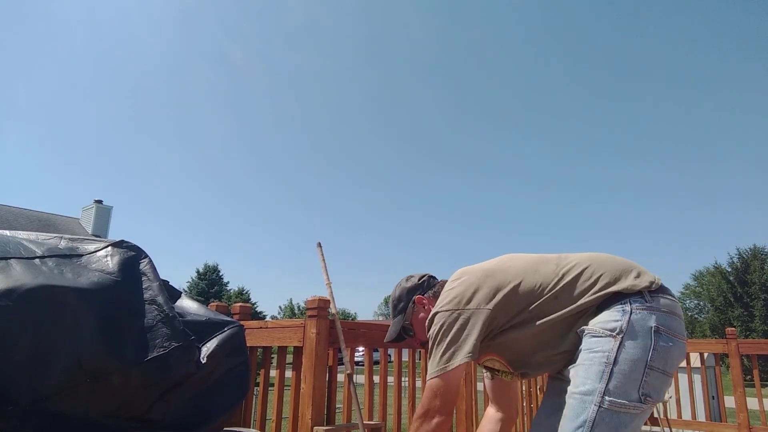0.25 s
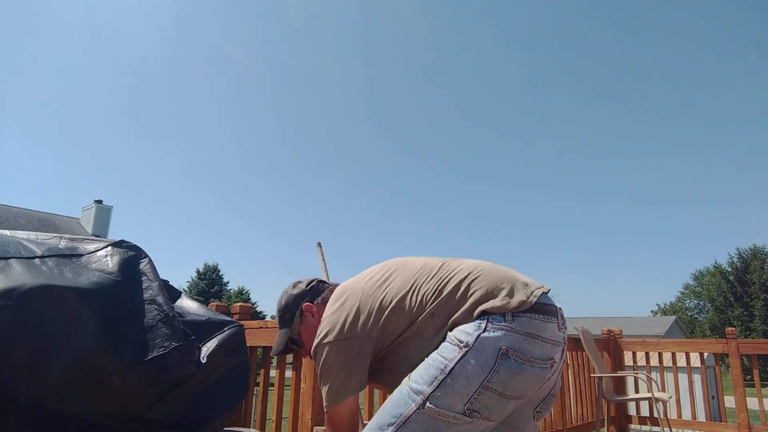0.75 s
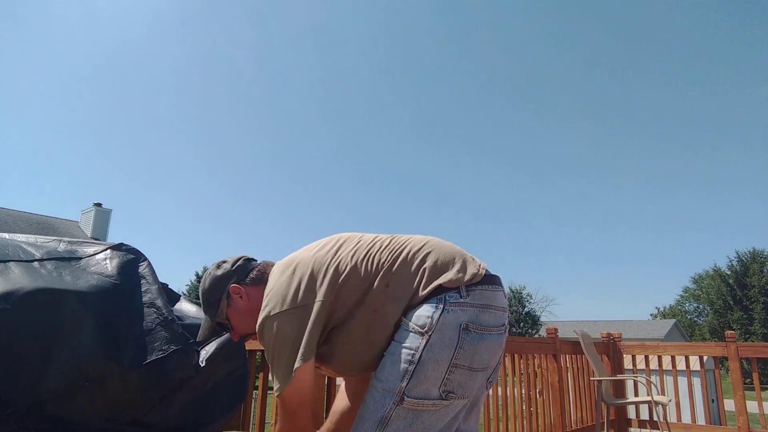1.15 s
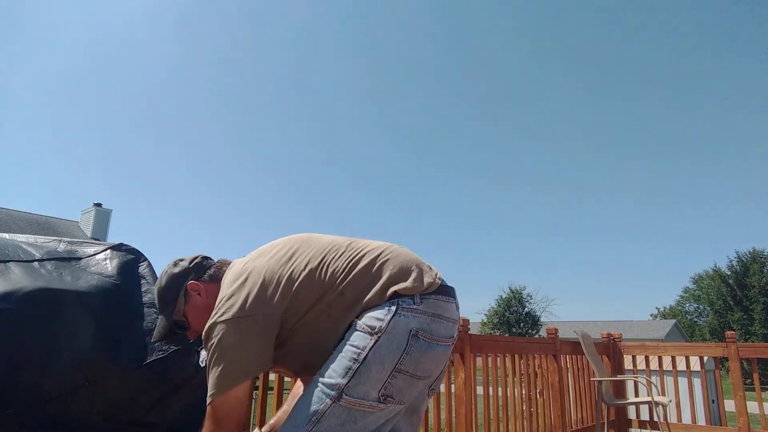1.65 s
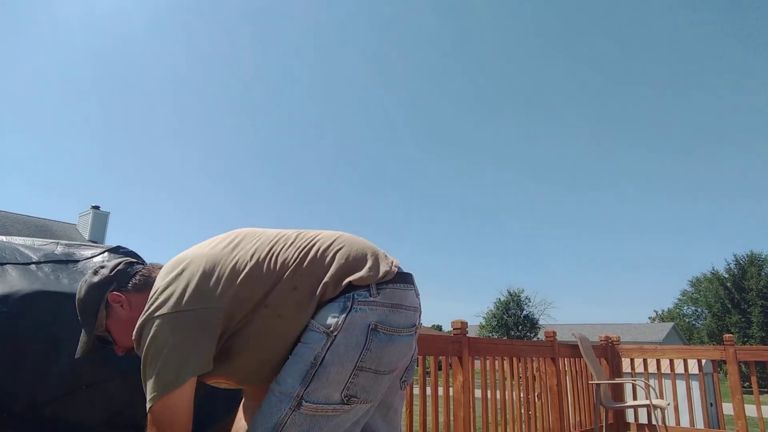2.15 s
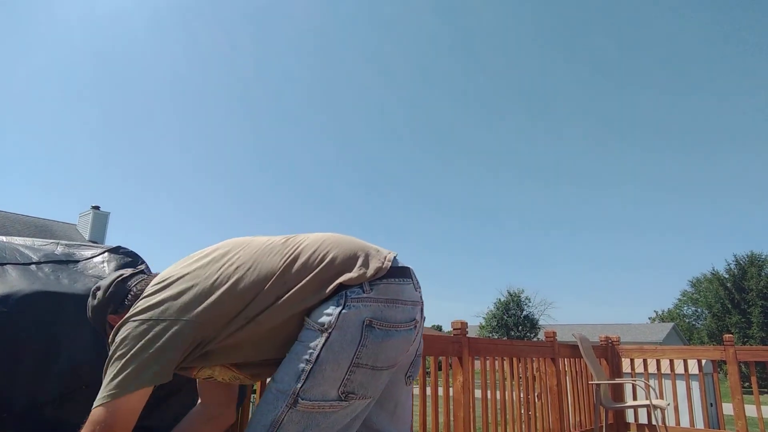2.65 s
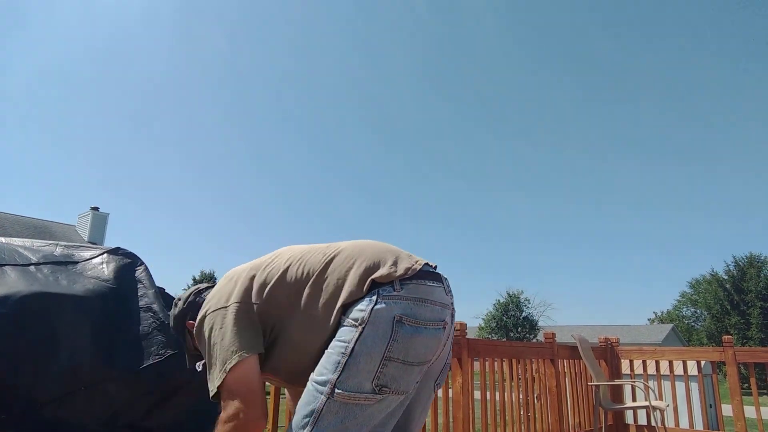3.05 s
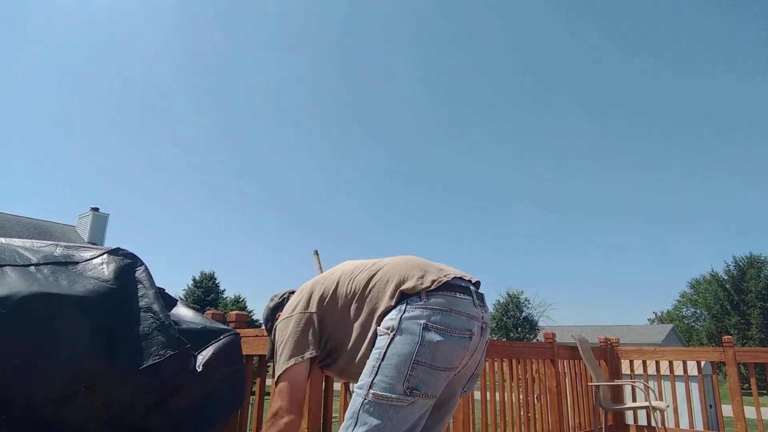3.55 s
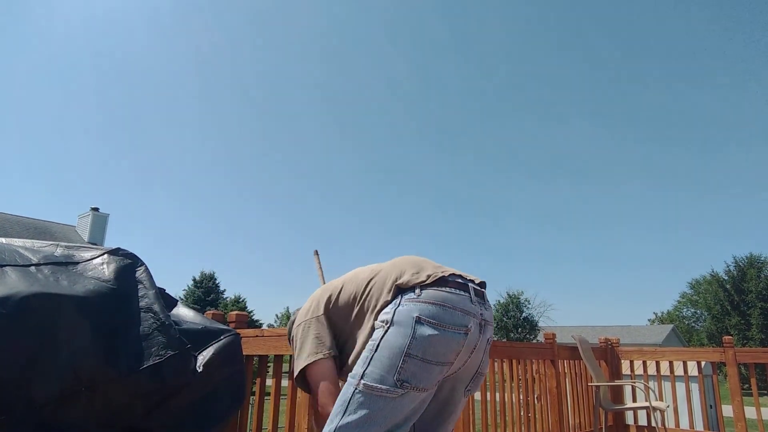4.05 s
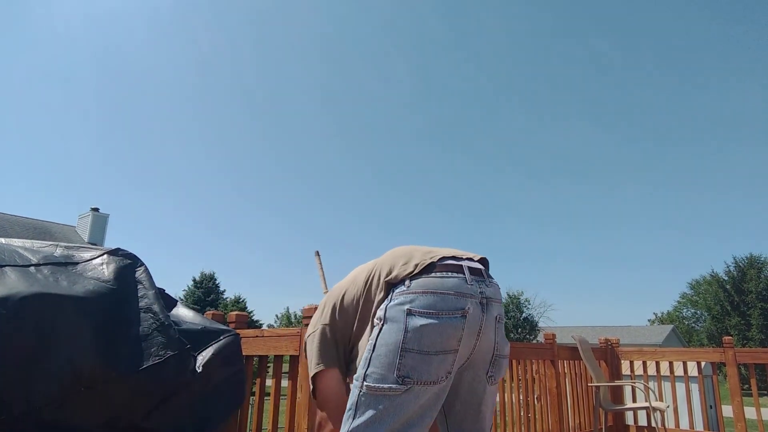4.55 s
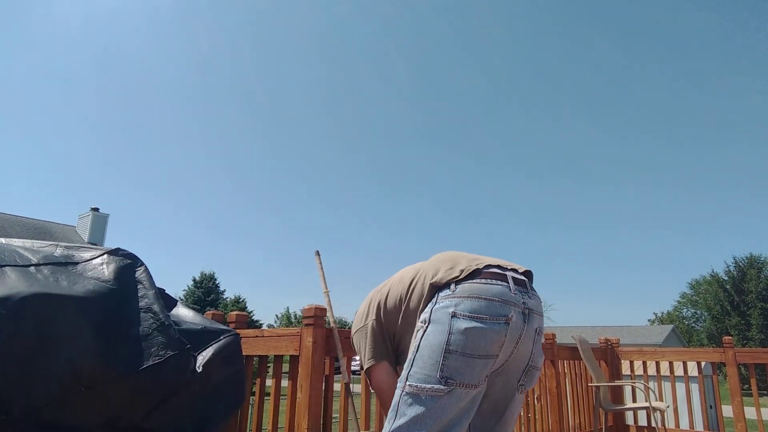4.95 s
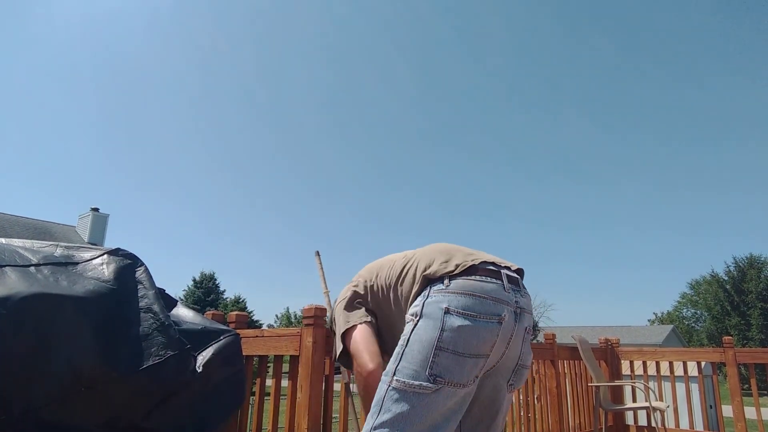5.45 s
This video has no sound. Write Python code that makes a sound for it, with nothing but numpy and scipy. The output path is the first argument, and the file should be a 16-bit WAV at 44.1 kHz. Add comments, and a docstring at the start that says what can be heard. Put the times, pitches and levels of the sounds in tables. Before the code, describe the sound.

Outdoors on a wooden deck, a heavy metal drum is heaved along close to a stereo microphone. Light knocks and a gritty scrape come first, then a tight cluster of loud board slaps around one second. Further heavy knocks follow in uneven bursts, with low rumble, dull metallic ringing and small woody taps between them. A small bird chirps faintly far off.

```python
"""A heavy metal drum is rolled in short heaves across a wooden deck, outdoors, close to two microphone ports.
Its rim knocks on the boards, which slap, tap, clatter and boom: bursts of noise and decaying sines.
Between knocks it rumbles and scrapes over the grain, as uneven noise, and snaps bits of grit.
A small bird chirps far off in gliding sines, above a faint steady noise of still air."""
import sys
import numpy as np
from scipy import signal
from scipy.io import wavfile
from scipy.ndimage import map_coordinates

SR = 44100
rng = np.random.default_rng(int(sys.argv[2]) if len(sys.argv) > 2 else 0)


def store_pcm(level_fs):
    """Save levels as 16-bit WAV."""
    pcm = np.round(np.clip(level_fs, -1, 1) * 32767).astype(np.int16)
    wavfile.write(sys.argv[1], SR, np.atleast_2d(pcm).T)


N = 252252
TIME = np.arange(N) / SR

# Rim meets board; the levels stand ahead of each layer's own trim. Each row: start in seconds, knock in dB,
# boom in dB, tick in dB, note of that board in Hz, level of the note relative to the boom in dB.
KNOCKS = [(0.012, -26.5, -38.5, -66, 484, 11.5), (0.139, -15.5, -27, -41, 510, 10.5),
          (0.18, -15.5, -40, -28, 248, 12), (0.218, -19, -50, -45, 514, 4),
          (0.292, -20, -39, -21.5, 245, 0), (0.515, -55, -36.5, -44, 100, 2.5),
          (0.564, -20, -43, -29, 325, 7), (0.636, -58, -33.5, -61, 125, 2.5),
          (0.67, -27, -46, -67, 272, 15), (1.017, -4.5, -33, -20, 354, 20.5),
          (1.069, -10.5, -47, -23, 590, 5), (1.08, -6, -21.5, -28, 276, -12),
          (1.107, -4, -18.5, -26, 322, -26), (1.168, -8, -21, -28.5, 278, -19),
          (1.549, -17.5, -51, -23, 428, -6), (1.644, -26, -39.5, -40, 274, 12.5),
          (1.921, -1.5, -22, -34, 510, 3), (2.018, -10, -31, -38, 410, -3),
          (2.092, -30.5, -53, -66, 596, 21.5), (2.275, -35.5, -42.5, -55, 178, 1.5),
          (2.866, -31.5, -35, -50, 480, 4), (2.889, -6.5, -35, -39, 430, 14.5),
          (2.897, -0.5, -23.5, -29, 550, 4), (3.058, -32.5, -46, -65, 550, 16),
          (3.296, -9.5, -34, -29.5, 240, 4), (3.332, -10, -36.5, -26, 384, 14.5),
          (3.357, -5, -20, -34, 258, 5.5), (3.412, -11.5, -32, -37, 557, -2),
          (3.48, -5.5, -27.5, -33, 350, -10), (3.489, -11, -23.5, -34, 282, 11.5),
          (3.585, -34, -36.5, -60, 368, 12.5), (3.896, -24.5, -32.5, -63, 319, 4.5),
          (4.134, -19, -34, -36.5, 282, 14), (4.161, -4.5, -48, -57, 600, -7),
          (4.212, -13, -37, -37, 390, 13), (4.641, -6, -26, -51, 393, 10),
          (5.066, -18.5, -33.5, -58, 360, 5), (5.122, -23, -39, -27.5, 268, 15),
          (5.304, -12.5, -22, -45, 364, 6), (5.319, -6, -32.5, -36, 544, 25.5),
          (5.341, -14.5, -38, -30.5, 365, 22)]


def from_db(db):
    """Decibels to amplitude gain."""
    return 10 ** (np.asarray(db) / 20)


def at_hz(points, hz):
    """Read a table of (Hz, value) on a log-frequency axis."""
    f, value = np.transpose(points)
    return np.interp(np.log(hz), np.log(f), value)


def drift(per_s):
    """Smooth chance: straight lines between random knots of spread 1, per_s of them a second."""
    knots = rng.standard_normal(N // 8)
    return np.interp(TIME * per_s, np.arange(len(knots)), knots)


def grain(per_s, rough_db):
    """An uneven contact force of rms 1."""
    force = from_db(rough_db * drift(per_s))
    return force / np.sqrt(np.mean(force ** 2))


def clicks(seconds, heights):
    """One impulse for each blow, over a tiny floor."""
    samples = np.round(np.clip(seconds, 0, TIME[-1]) * SR).astype(int)
    return np.bincount(samples, heights, N) + 1e-18


def ring(force, hz, t60):
    """A resonator: a unit click sets a sine of height 1 ringing, down 60 dB after t60 seconds."""
    radius = from_db(-60 / (t60 * SR))
    w = 2 * np.pi * hz / SR
    return signal.lfilter([0, np.sin(w)], [1, -2 * radius * np.cos(w), radius * radius], force)


def die_away(energy, t60):
    """Stored energy leaks away exponentially, down 60 dB after t60 seconds."""
    return signal.lfilter([1], [1, -from_db(-120 / (t60 * SR))], energy)


def swell(s, db, rise, fall):
    """Power of a push that grows up to its moment and then dies away."""
    span_db = 20.5  # covered in one rise or fall time
    distance = np.maximum((s - TIME) / rise, (TIME - s) / fall).clip(max=10)
    return from_db(db - span_db * distance) ** 2


def deck(knock_db=-11, boom_db=-2, tick_db=-13, clatter_t60=0.11, crack_t60=0.015, crack_db=3):
    """Each knock cracks, then sets the boards clattering briefly; the whole frame booms on, longest in the bass."""
    # Colour of the struck deck. Each row: frequency in Hz, relative level in dB.
    deck_colour = [(30, -27), (65, -10), (100, -10.5), (160, 1.5), (260, 5), (450, 2), (800, -4.5),
                   (1250, -3), (1900, -20), (2600, 4), (3600, -14.5), (5200, -10), (8500, -25),
                   (15000, -19)]
    # Die-away of the deck. Each row: frequency in Hz, t60 in seconds.
    boom_t60 = [(60, 1), (170, 0.63), (340, 0.49), (700, 0.43), (1400, 0.29), (3000, 0.11), (15000, 0.23)]
    # Share of the long boom against the first clatter. Each row: frequency in Hz, level in dB.
    boom_share = [(60, -4), (200, -2), (500, -9.5), (1200, -16), (4000, 14), (15000, -36)]
    splinter_from_db, splinter_growth = -30.5, 0.99  # tick where splintering starts; crack dB per tick dB

    s, knock, boom, tick, _, _ = np.transpose(KNOCKS)
    splinter = splinter_growth * np.maximum(tick - splinter_from_db, 0)
    rattle = grain(260, rough_db=2.5) ** 2

    def band_power(hz):
        # boom rules the bass, knock the middle, tick the treble
        low = at_hz([(230, 1), (600, 0)], hz)
        high = at_hz([(1600, 0), (2600, 1)], hz)
        level = low * (boom + boom_db) + high * (tick + tick_db) + (1 - low - high) * (knock + knock_db)
        colour = at_hz(deck_colour, hz)
        energy = clicks(s, from_db(level + colour) ** 2)
        clatter = die_away(energy, clatter_t60)
        tail = die_away(energy, at_hz(boom_t60, hz)) * from_db(at_hz(boom_share, hz)) ** 2
        crack = clicks(s, (1 - low) * from_db(tick + tick_db + splinter + crack_db + colour) ** 2)
        return (clatter + tail) * rattle + die_away(crack, crack_t60)
    return band_power


def slaps(contact_s=0.0012, bend_hz=900, bend_width_hz=1300):
    """The full weight drops and the board under the rim cracks for a few cycles."""
    # Each row: start in seconds, level in dB, pitch in Hz.
    board_slaps = [(1.107, -4, 760), (1.55, -12, 1270), (1.9214, 3.5, 1060), (2.018, -13, 865),
                   (2.897, -2, 967), (3.357, -9, 656), (3.488, -5, 787), (4.161, 0.5, 890),
                   (4.64, -2.5, 925), (5.319, -1.5, 670)]
    # The struck board itself. Each row: multiple of the slap pitch, level in dB, t60 in seconds.
    slap_modes = [(.5, -9, 0.011), (1.0, 3.5, 0.0093), (1.33, -3, 0.013), (2.9, -15, 0.0049)]

    out = np.zeros(N)
    soft = np.exp(-2 * np.pi / (contact_s * SR))  # soft contact dulls the blow above 1 / contact_s
    push = (1 - soft) * soft ** np.arange(SR // 16)
    # bending waves disperse: an all-pass makes the blow swell over a cycle or two
    _, poles = signal.iirpeak(bend_hz, bend_hz / bend_width_hz, SR)
    push = signal.lfilter(poles[::-1], poles, push)
    for s, slap_db, hz in board_slaps:
        crack = np.zeros(len(push))
        for k, (multiple, db, t60) in enumerate(slap_modes):
            crack += (-1) ** k * from_db(db) * ring(push, multiple * hz, t60)
        start = int(s * SR)
        out[start:start + len(crack)] += from_db(slap_db) * crack
    return out


def taps(knock_db=-9, bump_db=3, chatter_db=-25, chatter_t60=0.31, per_s=45, spread_db=4, cycles=7):
    """Dry woody taps: one at each knock, and small ones as the rim rides ridges or chatters after a blow."""
    # A board tapped lightly. Each row: frequency in Hz, level in dB.
    tap_modes = [(290, -9.5), (505, -4.5), (680, -6.5), (950, -8), (1300, -14)]
    tap_top_db = -21  # the tap of a knock grows no harder than this

    s, knock = np.transpose(KNOCKS)[:2]
    chatter = die_away(clicks(s, from_db(knock + chatter_db) ** 2), chatter_t60)
    unrest = roll_power()[1] * from_db(bump_db) ** 2 + chatter
    born = rng.random(N) < per_s / SR
    sizes = from_db(spread_db * (np.minimum(rng.exponential(1, N), 3) - 1))
    ridges = born * np.sqrt(unrest) * sizes
    force = clicks(s, from_db(np.minimum(knock + knock_db, tap_top_db))) + ridges
    out = np.zeros(N)
    for k, (hz, db) in enumerate(tap_modes):
        uneven = from_db(db + 3.7 * drift(90))
        out += (-1) ** k * ring(force * uneven, hz, cycles / hz)
    return out


def boards(cycles=20, level_db=2):
    """Every board that takes the weight bends and rings with a short hollow note, down 60 dB after `cycles`."""
    out = np.zeros(N)
    for s, _, boom, _, hz, note in KNOCKS:
        start = int(s * SR)
        age = TIME[:min(SR // 4, N - start)]
        onset = 1 - np.exp(-2 * hz * age)
        fade = from_db(boom + note + level_db - 60 * hz * age / cycles)
        out[start:start + len(age)] += onset * fade * np.sin(2 * np.pi * hz * age)
    return out


def drum(level_db=-2, spread_db=3):
    """The loaded shell rings dully; every knock meets each mode with a strength of its own."""
    # Drum and boards together. Each row: frequency in Hz, level in dB, t60 in seconds.
    shell_modes = [(78.7, -21, 0.31), (95.4, -23.5, 0.65), (153.4, -30, 0.33), (198.5, -18.5, 0.24),
                   (267.4, -12.5, 0.31), (295.7, -11, 0.15), (368, -26.5, 0.19), (433, -20.5, 0.58),
                   (484.4, -16.5, 0.24), (621, -18.5, 0.36), (980, -45, 0.147), (1146, -28, 0.093)]

    s, knock, boom = np.transpose(KNOCKS)[:3]
    chance = rng.standard_normal((len(s), 2, len(shell_modes)))
    blow_db = (knock + boom)[:, None] / 2 + level_db
    strength = np.sign(chance[:, 0]) * from_db(spread_db * chance[:, 1] + blow_db)
    out = np.zeros(N)
    for k, (hz, db, t60) in enumerate(shell_modes):
        out += ring(clicks(s, strength[:, k] * from_db(db)), hz, t60)
    return out


def roll_power():
    """Boom and rumble power of the rolling rim: heave upon heave over a slow creep."""
    # The drum gathers speed, then coasts. Each row: moment of top speed in seconds, boom in dB, rumble in dB,
    # rise in seconds, fall in seconds.
    heaves = [(0.1, -37.5, -39, 1, 1.0), (0.74, -40, -46, 0.061, 0.26), (1.09, -55, -27, 0.14, 0.18),
              (1.2, -33.5, -36, 0.099, .5), (1.8, -45.5, -59.5, 0.34, 0.44), (2.02, -40, -40.5, 0.38, 0.29),
              (2.95, -32.5, -42, 0.24, 0.21), (3.48, -29.5, -30.5, 0.15, 0.28),
              (4.19, -34.5, -39.5, 0.22, 0.46), (4.72, -40.5, -44.5, 0.25, 0.29),
              (5.13, -40.5, -32.5, 0.16, 0.31), (5.3, -35, -30, 0.058, 0.087)]
    creep_boom_db, creep_rumble_db = -56.5, -58  # the drum never quite rests

    boom = sum(swell(s, db, rise, fall) for s, db, _, rise, fall in heaves)
    rumble = sum(swell(s, db, rise, fall) for s, _, db, rise, fall in heaves)
    return boom + from_db(creep_boom_db) ** 2, rumble + from_db(creep_rumble_db) ** 2


def skid_level(creep_db=-75.5):
    """Level of the sliding contact in dB: skids of the rim over a slow creep."""
    # Each row: moment at its height in seconds, scrape in dB, rise in seconds, fall in seconds.
    skids = [(0.2, -47.5, 0.21, 0.38), (0.296, -33.5, 0.018, 0.033), (0.568, -52, 0.047, 0.068),
             (0.79, -60, .12, 0.14), (1.07, -44.5, 0.1, .27), (1.36, -45, 0.052, 0.044),
             (1.665, -47.5, 0.033, 0.08), (1.97, -54.5, 0.2, 0.15), (2.03, -48.5, 0.052, .075),
             (2.79, -66, 0.51, 0.39), (2.909, -46.5, 0.018, 0.11), (3.315, -41, .015, 0.12),
             (3.49, -52.5, 0.25, 0.14), (3.82, -55, 0.11, 0.12), (4.155, -50, 0.19, 0.19),
             (4.342, -46.5, 0.22, 0.054), (4.68, -57.5, 0.23, 0.13), (4.98, -51, 0.19, 0.32),
             (5.13, -51, 0.36, 0.31), (5.324, -35.5, 0.048, 0.072)]
    return 10 * np.log10(sum(swell(*skid) for skid in skids) + from_db(creep_db) ** 2)


def rolling(sliding, boom_db=0, rumble_db=0, scrape_db=-8, drag_db=-2):
    """The rim bumps over the grain, skids on grit and drags: noise bands with uneven power."""
    # Short drags of the rim. Each row: middle in seconds, level in dB ahead of drag_db, half length in seconds.
    drags = [(0.315, -27, 0.017), (1.357, -29, 0.012), (1.669, -35.5, 0.011), (3.653, -36.5, 0.009),
             (3.827, -35, 0.027), (4.341, -38, 0.027), (5.108, -34, 0.031), (5.196, -34.5, 0.013)]
    # Colours of the three contacts. Each row: frequency in Hz, relative level in dB.
    rumble_colour = [(30, -15), (60, -3), (100, 5), (160, 2.5), (270, -3), (500, 1), (900, -7),
                     (1400, -7.5), (2000, -33), (3500, -16.5), (8000, -50), (16000, -51)]
    scrape_colour = [(30, -1), (300, -10), (1300, 12.5), (1900, -5.5), (2600, 7), (3700, 8.5), (5200, 1.5),
                     (7000, -8.5), (9000, -12.5), (12000, -8), (15000, -2)]
    drag_colour = [(30, -54), (200, -0.5), (600, -6.5), (1250, -2), (1900, -21), (3000, -18), (6000, -44),
                   (15000, -36.5)]

    boom, rumble = roll_power()
    bumps = grain(110, rough_db=3.5) ** 2
    rasp = (grain(1500, rough_db=1.5) * grain(110, rough_db=2)) ** 2
    scrape = from_db(sliding + scrape_db) ** 2 * rasp
    drag = np.zeros(N)
    for s, db, half in drags:
        drag += rasp * from_db(db + drag_db) ** 2 * np.exp(-((TIME - s) / half) ** 2)

    def band_power(hz):
        low = at_hz([(150, 1), (300, 0)], hz)  # boom below, rumble above
        roll = bumps * (boom * low * from_db(boom_db) ** 2 + rumble * (1 - low) * from_db(rumble_db) ** 2)
        layers = (roll, rumble_colour), (scrape, scrape_colour), (drag, drag_colour)
        return sum(power * from_db(at_hz(colour, hz)) ** 2 for power, colour in layers)
    return band_power


def grit(sliding, snap_db=-4, loose_db=-5, per_s=110, spread_db=4, far_port_db=-7):
    """Grains snap under the rim: a few big ones, and many small ones wherever it slides."""
    # Big grains. Each row: start in seconds, peak in dB ahead of snap_db and the ring.
    snaps = [(0.1785, -17), (0.1968, -11), (0.2927, -25), (0.5626, -37), (0.7866, -49), (1.014, -14),
             (1.1034, -32), (1.1518, -30), (1.5504, -20), (1.9235, -52), (2.8994, -51), (2.9744, -46),
             (3.2994, -21), (3.7214, -34), (4.6703, -33)]
    # Ring of a grain against steel. Each row: frequency in Hz, level in dB, t60 in seconds.
    grain_ring = [(2700, 3.5, 0.0035), (5360, 2, 0.0017), (7700, -4, 0.0013), (11800, -6, 0.0031),
                  (14900, 6, 0.0036)]

    s, db = np.transpose(snaps)
    born = rng.random(N) < per_s / SR
    sizes = from_db(sliding + loose_db + spread_db * np.minimum(rng.exponential(1, N), 3))
    force = clicks(s, from_db(db + snap_db)) + born * sizes
    sound = np.zeros(N)
    for k, (hz, level, t60) in enumerate(grain_ring):
        uneven = from_db(level + 2 * drift(280))
        sound += (-1) ** k * ring(force * uneven, hz, t60)
    return sound * from_db([[0], [far_port_db]])  # the right port hears it weaker


def bird(waver_hz=230, echo_t60=0.33, direct_db=-3):
    """Husky gliding chirps, smeared by echoes from houses and trees (decaying noise, one for each port)."""
    # Each row: start in seconds, length in seconds, start pitch in Hz, end pitch in Hz, level in dB.
    chirps = [(1.705, .05, 3150, 3300, -44), (1.74, .04, 3700, 3100, -49), (2.275, .035, 4800, 5000, -56),
              (2.325, .06, 3300, 4000, -58), (4.79, .03, 3800, 3350, -43), (4.82, .055, 3050, 3200, -42)]

    song = np.zeros(N)
    waver = waver_hz * drift(700)
    for s, length, start_hz, end_hz, db in chirps:
        progress = np.clip((TIME - s) / length, 0, 1)
        pitch = start_hz + (end_hz - start_hz) * progress + waver
        song += from_db(db) * np.sin(np.pi * progress) * np.sin(2 * np.pi * np.cumsum(pitch) / SR)
    echoes = rng.standard_normal((2, SR // 3)) * from_db(-60 * TIME[:SR // 3] / echo_t60)
    echoes /= np.linalg.norm(echoes, axis=1, keepdims=True)
    return from_db(direct_db) * song + signal.fftconvolve(song[None], echoes, axes=1)[:, :N]


def still_air(air_db=-58):
    """Still outdoor air: a faint steady noise."""
    # Each row: frequency in Hz, relative level in dB.
    air_colour = [(30, -26), (80, 11), (200, -9), (600, -10), (1300, -4.5), (2000, -16), (3200, -28),
                  (6000, -38), (9000, -38), (15000, -34.5)]
    return lambda hz: from_db(air_db) ** 2 * from_db(at_hz(air_colour, hz)) ** 2


def diffuse(band_power):
    """Crowded modes heard at both ports; band_power(hz) is the power in 1 kHz of bandwidth."""
    # Difference between the ports against their sum. Each row: frequency in Hz, level in dB.
    port_side = [(40, -6), (100, -6), (200, -14.5), (400, -10), (800, -2.5), (1200, 2), (2200, -4.5),
                 (4000, -0.5), (15000, 2.5)]
    # Left port against right. Each row: frequency in Hz, level in dB.
    port_balance = [(60, 4.5), (400, 3.5), (1500, -5.5), (4000, 2), (8000, 25.5), (15000, 15)]

    edges = np.geomspace(28, 17000, 25)  # band edges in Hz
    centres = np.sqrt(edges[1:] * edges[:-1])
    out = np.zeros((2, N))
    white = rng.standard_normal((2, 2, N)) * np.sqrt(SR / 2000)  # unit power in each kHz
    for k, hz in enumerate(centres):
        band = signal.butter(2, edges[k:k + 2], "band", fs=SR, output="sos")
        mid, side = signal.sosfilt(band, white[k % 2])  # neighbouring bands use separate noise
        side = side * from_db(at_hz(port_side, hz))
        lean = from_db(at_hz(port_balance, hz) / 2)
        out += np.sqrt(band_power(hz)) * np.array([(mid + side) * lean, (mid - side) / lean])
    return out


def coloured(x):
    """Narrow resonances stand out of the crowd of modes."""
    # They colour clatter, rolling and air alike. Each row: frequency in Hz, width in Hz, level in dB.
    resonances = [(259, 43, -8.5), (374, 22, -8), (510, 16, -36), (936, 9.3, -11.5), (1190, 11, -38),
                  (2416, 198, 10), (2750, 78, 1.5), (3370, 14, -30), (3560, 29, -15), (4010, 170, -8),
                  (4510, 150, 1), (4976, 84, 0), (5280, 65, -4), (6310, 63, 5), (7470, 21.4, -23),
                  (14205, 72, -15), (14900, 49, 2)]
    out = x
    for hz, width, db in resonances:
        out = out + from_db(db) * signal.lfilter(*signal.iirpeak(hz, hz / width, SR), x)
    return out


def scene():
    """Sound pressure at the two ports."""
    sliding = skid_level()
    knocked, rolled, air = deck(), rolling(sliding), still_air()
    clatter = coloured(diffuse(lambda hz: knocked(hz) + rolled(hz) + air(hz)))
    return clatter + slaps() + taps() + boards() + drum() + grit(sliding) + bird()


def record(dry, shelf_low_hz=50, shelf_high_hz=700, low_cut_hz=52, left_bright=0.21):
    """Ports round hard peaks; each channel is one port minus the other, delayed; a shelf restores the bass."""
    port_limit, crossfeed = 0.88, 0.9
    port_delay_s, cutoff_hz = 0.000451, 15850

    ports = dry / (1 + (dry / port_limit) ** 6) ** (1 / 6)
    late_at = np.arange(N) - port_delay_s * SR
    late = np.array([map_coordinates(port, [late_at], order=3) for port in ports[::-1]])
    pair = (ports - crossfeed * late) / 2
    # the left side is a little brighter, the right a little duller
    pair = pair + left_bright * np.array([[1], [-1]]) * np.diff(pair, prepend=0) / 2
    shelf = signal.bilinear([1, 2 * np.pi * shelf_high_hz], [1, 2 * np.pi * shelf_low_hz], SR)
    pair = signal.lfilter(*shelf, pair)
    pair = signal.sosfilt(signal.butter(2, low_cut_hz, "high", fs=SR, output="sos"), pair)
    # the top is cut steeply
    return signal.sosfilt(signal.ellip(10, .3, 70, cutoff_hz, fs=SR, output="sos"), pair)


dry = scene()
out = record(dry)
store_pcm(out)
```